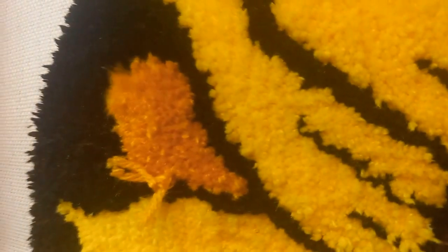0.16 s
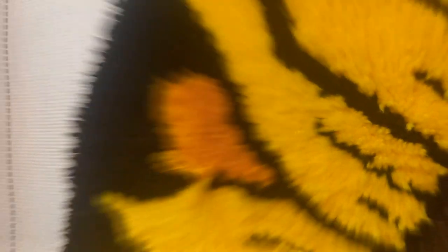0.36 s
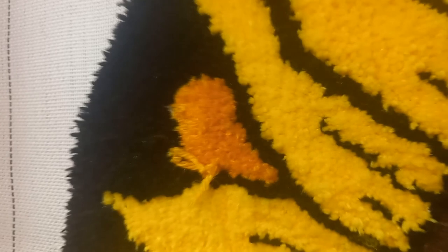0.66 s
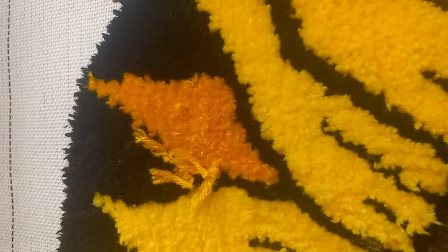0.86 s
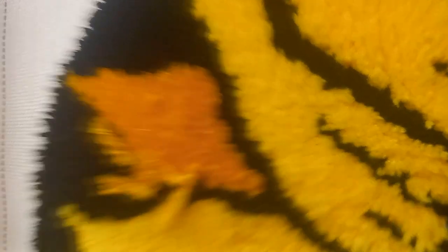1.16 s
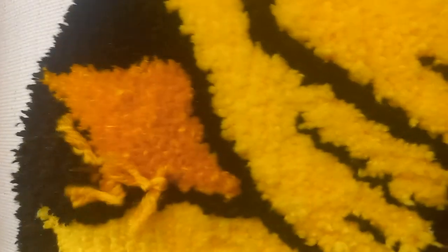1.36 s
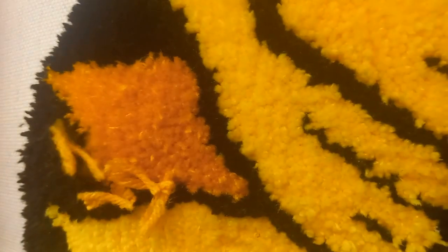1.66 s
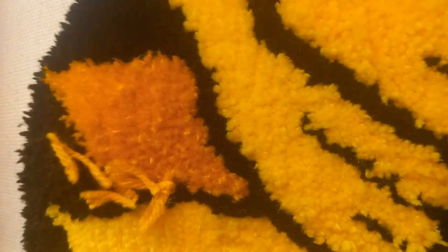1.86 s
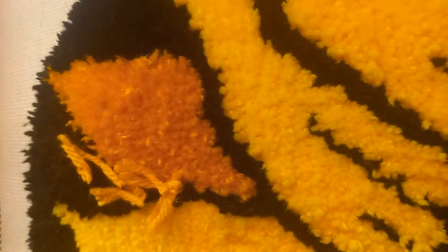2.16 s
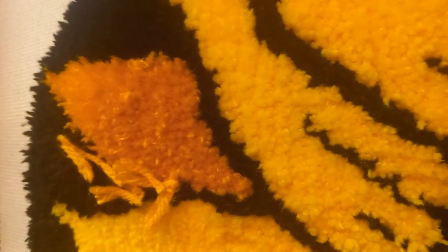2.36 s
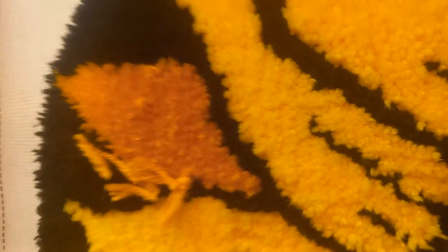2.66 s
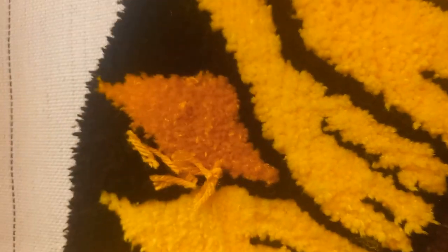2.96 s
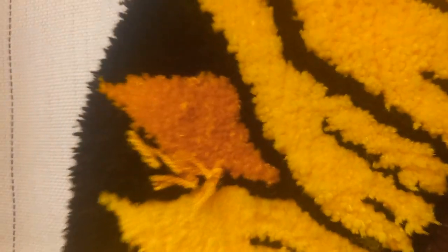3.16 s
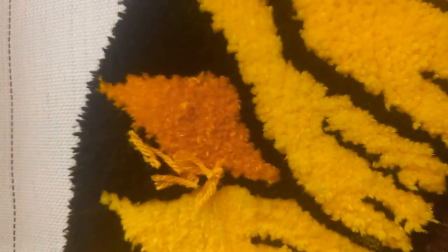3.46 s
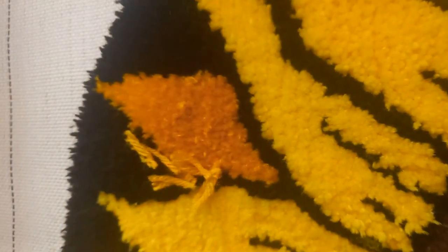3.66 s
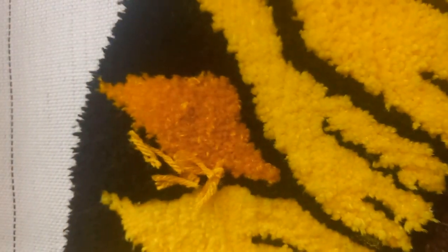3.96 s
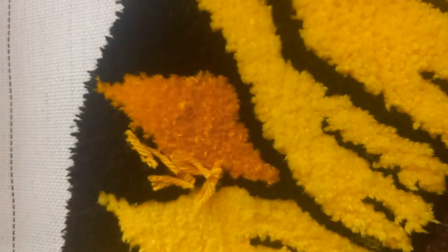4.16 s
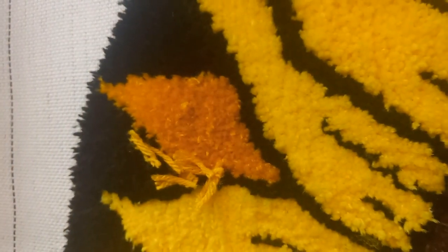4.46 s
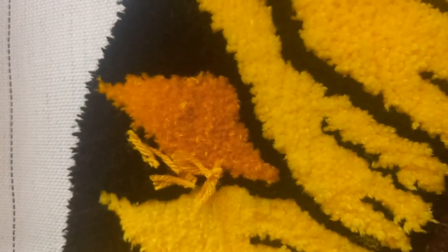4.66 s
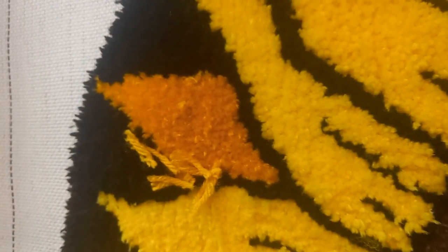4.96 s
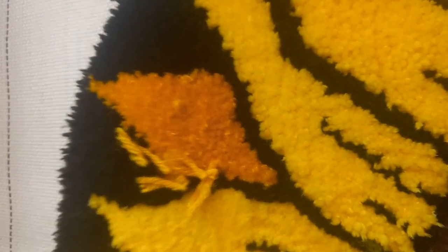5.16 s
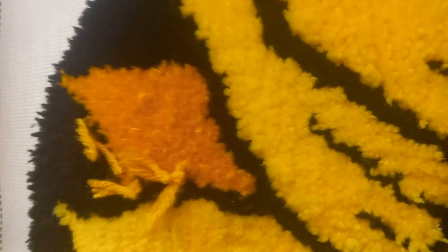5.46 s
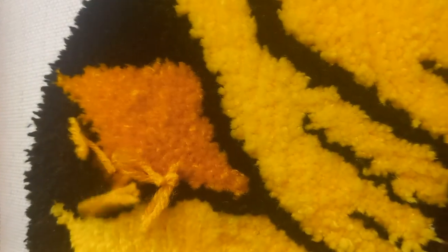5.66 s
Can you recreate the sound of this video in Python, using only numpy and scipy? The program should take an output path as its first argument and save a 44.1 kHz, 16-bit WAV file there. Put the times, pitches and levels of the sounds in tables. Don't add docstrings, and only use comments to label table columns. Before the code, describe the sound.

Close phone recording in a small workshop with a short, bright echo. A tufting gun is already running at 0 s: harsh brush rattle, low cloth thumps and crisp scissor snips about eleven times a second, and a gear whine around 2.2 kHz swinging in pitch twice per stroke. It cuts off at 0.3 s with a click and a short ring. Quiet low hum follows; a soft cloth rustle and dull bumps come near 1.18 s. At 1.34 s the trigger clacks, the case rings and the motor surges, then runs steadily, with heavier knocks around 2.14 and 2.33 s. It slows slightly and stops at about 2.75 s, its echo dying within half a second. The hum is nearly gone, then creeps back from about 4 s. Tiny dry yarn ticks fall between 4.1 and 5.25 s. At 5.56 s a hard click and clunk restart the gun, louder and shriller, running to the end.

```python
import sys
import numpy as np
from scipy import signal
from scipy.fft import rfft, irfft, next_fast_len
from scipy.io import wavfile
from scipy.ndimage import map_coordinates

SR = 44100
rng = np.random.default_rng(int(sys.argv[2]) if len(sys.argv) > 2 else 0)


def voltage_ratio(level):
    return 10 ** (np.asarray(level, float) / 20)


def wrap_up_sound(samples):
    columns = np.atleast_2d(samples).T
    tamed = np.clip(columns, -1, 1)
    steps = np.round(tamed * 32767).astype(np.int16)
    wavfile.write(sys.argv[1], SR, steps)


N = 255853
T = np.arange(N) / SR
SCENE_CHANGE_S = .856


def unit(x):
    return x / np.sqrt(np.mean(x ** 2) + 1e-20)


def along(points, hz, axis=1):
    rows = np.transpose(points)
    return np.interp(np.log(hz + 1), np.log(rows[0] + 1), rows[axis])


def wobble(rate):
    knots = rng.standard_normal(int(N * rate / SR) + 4)
    return map_coordinates(knots, [T * rate])


def filtered(x, response):
    m = next_fast_len(N + SR // 2)
    spectrum = rfft(x, m) * response(np.fft.rfftfreq(m, 1 / SR))
    return irfft(spectrum, m)[..., :N]


def hiss(response):
    return unit(filtered(rng.standard_normal((2, N)), response))


def heard(two, pair):
    def ear(sign, hz):
        blend = np.arccos(np.clip(along(pair, hz), 0, 1)) / 2
        balance = voltage_ratio(sign * along(pair, hz, axis=2) / 2)
        lead = np.exp(.5j * sign * along(pair, hz, axis=3))
        return balance * lead * np.array([np.cos(blend), sign * np.sin(blend)])
    return np.array([filtered(two, lambda hz: ear(sign, hz)).sum(0) for sign in (1, -1)])


# (power on [s], power off [s], start surge [dB], controller kick [dB], gain control depth [dB])
BURSTS = [
    (-.07, .302, 4, 2, 16.5),
    (1.339, 2.765, 5.5, 15, 12),
    (5.562, 6.5, 6, 28, 10),
]
CLAMP_S, HOLD_S, RECOVER_S = 0.57, 1.096, 0.27


def gain_control():
    gain_db = 0
    for on, off, *_, depth_db in BURSTS:
        closing = (T > on) * (1 - np.exp(-np.abs(T - on) / CLAMP_S))
        shut = closing * np.exp(-np.clip(T - off - HOLD_S, 0, None) / RECOVER_S)
        gain_db = gain_db - depth_db * shut * ((on > 0) | (T < SCENE_CHANGE_S))
    return gain_db


# (frequency [Hz], density [dB per Hz])
HUM_COLOUR = [(32, -41.5), (55, -14), (108, -1), (188, -9.5), (251, -7.5), (285, -2), (392, -11), (432, -8),
              (557, -13.5), (708, -21.5), (2500, -36.5), (3250, -72.5), (5500, -120)]
# (frequency [Hz], density [dB per Hz])
HISS_COLOUR = [(1180, -34.5), (2000, -6.5), (2220, -11.5), (2740, -3.5), (4940, -7.5), (9250, -22.5),
               (10600, -12.5), (12700, -6.5), (15200, -6.5), (16000, -14)]
# (frequency [Hz], likeness [0-1], left over right [dB], left lead [rad])
TONE_PAIR = [(90, 0.77, -1.5, 0), (300, 0.89, -0.3, .25), (600, 1, -2, 1.1), (1060, 0.14, 3.5, 0.96),
             (1600, .1, -2.5, 0.35), (7920, .03, 7.5, 0.06), (13500, .01, -1, 0.19)]
HUM_DB, HISS_DB, HISS_DEPTH = -44.5, -65, 1.19
RUSTLE_S, RUSTLE_DB, RUSTLE_HALF_S = 1.172, 8, 0.034


def room_tone():
    gain_db = gain_control()
    rustle_db = RUSTLE_DB * np.exp(-((T - RUSTLE_S) / RUSTLE_HALF_S) ** 2)
    hum_db = HUM_DB + gain_db + .4 * rustle_db + 0.71 * wobble(12)
    hum = hiss(lambda f: voltage_ratio(along(HUM_COLOUR, f))) * voltage_ratio(hum_db)
    air_db = HISS_DB + HISS_DEPTH * gain_db + rustle_db
    air = hiss(lambda f: voltage_ratio(along(HISS_COLOUR, f))) * voltage_ratio(air_db)
    return heard(hum + air, TONE_PAIR)


# (frequency [Hz], time to fall 60 dB [s])
SHOP_DECAY = [(100, 0.24), (500, 0.45), (1100, 0.55), (2200, 0.57), (3500, 0.65), (6000, 0.56),
              (14000, 0.29)]


def shop(x):
    _, t, z = signal.stft(noise := rng.standard_normal((2, SR * 3 // 4)), SR, nperseg=256)
    hz = np.fft.rfftfreq(256, 1 / SR)
    fade_db = -60 * t * (0.74 + 1.1 * t) / along(SHOP_DECAY, hz)[:, None]
    tail = signal.istft(z * voltage_ratio(fade_db), SR, nperseg=256)[1]
    tail = tail / np.linalg.norm(tail[0])
    delayed = np.pad(x, (300, 0))[None]
    return signal.fftconvolve(delayed, tail, axes=1)[:, :N]


# (time [s], peak [dB])
TICKS = [
    (1.177, -51),
    (4.0844, -76),
    (4.4593, -58),
    (4.8444, -63),
    (4.9142, -59.5),
    (5.0855, -62),
    (5.253, -53.5),
]


def ticks():
    gate = sum((T > s) * voltage_ratio(db + 3.5 - 60 * np.abs(T - s) / 0.014) for s, db in TICKS)
    colour = [(2500, -28), (5000, -2.5), (7000, -2.5), (12000, -13), (16000, -17.5)]  # (Hz, dB per Hz)
    return gate * hiss(lambda f: voltage_ratio(along(colour, f))) * voltage_ratio([[2.2], [-2.2]])


# (time [s], peak [dB], pitch [Hz])
THUDS = [(0.261, -27.5, 300), (1.177, -36, 142), (1.194, -34, 85), (1.342, -22.5, 380), (1.348, -24.5, 125),
         (1.362, -15.5, 501), (1.444, -27, 237), (2.086, -25, 200), (2.137, -27.5, 226),
         (2.277, -25.5, 113), (2.328, -31.5, 218), (2.361, -33.5, 181), (2.379, -20.5, 105.1),
         (2.38, -22, 419), (2.76, -28.5, 130), (5.078, -33, 104), (5.5687, -20, 226), (5.579, -14, 600)]
# (pitch [Hz], time to fall 60 dB [s], hits [(time [s], peak [dB])])
RINGS = [
    (300, .18, [(1.352, -23), (5.628, -27)]),
    (2211.7, 0.19, [(.303, -33), (1.354, -24), (2.738, -26), (5.546, -50.5), (5.579, -22)]),
    (1086, 0.092, [(5.578, -22), (5.603, -27.5)]),
    (2025, 0.097, [(1.371, -28)]),
    (2480, 0.011, [(1.318, -45), (1.33, -42), (5.531, -48), (5.543, -29)]),
    (3760, .012, [(1.343, -32), (5.561, -27.5)]),
    (5400, .012, [(1.341, -28), (5.562, -32)]),
]
# (time [s], peak [dB])
CRACKS = [(.112, -40), (.288, -36.5), (.302, -33), (1.344, -33.5), (1.352, -36), (1.383, -34),
          (1.362, -32.5), (1.37, -29.5), (1.445, -34.5), (2.137, -36), (2.328, -38.5), (5.546, -61.5),
          (5.577, -40.5)]
THUD_CYCLES = 12
LOOSE = .018


def knocks():
    out, shake = np.zeros((2, N)), wobble(250)
    rings = [(s, db, hz, THUD_CYCLES / hz) for s, db, hz in THUDS]
    rings += [(s, db, hz, t60) for hz, t60, hits in RINGS for s, db in hits]
    for s, db, hz, t60 in rings:
        near = slice(round(s * SR), round(s * SR) + SR // 5)
        t = T[near] - s
        sag = 1 - np.exp(-t / .004) if hz < 1000 else 0
        cycles = hz * (t + LOOSE * np.cumsum(shake[near]) / SR) + 0.74 * sag
        out[0, near] += voltage_ratio(db - 60 * t / t60) * np.sin(2 * np.pi * cycles)
    gate = sum((T > s) * voltage_ratio(db - 60 * np.abs(T - s) / 0.012) for s, db in CRACKS)
    return out + gate * rng.standard_normal((2, N))


# (time [s], depth [dB], recovery [s])
DUCKS = [
    (.113, -5.5, 0.059),
    (1.433, -13.5, 0.038),
    (2.133, -8.5, 0.054),
    (2.312, -8, 0.079),
]


def ducking():
    gain_db = 0
    for s, db, back in DUCKS:
        drop = np.clip((T - s) / .006 + .5, 0, 1)
        gain_db = gain_db + db * drop * np.exp(-(np.abs(T - s) / back) ** 2)
    return voltage_ratio(gain_db)


RATTLE_DB, BODY_DB, DRIVE_DB, LOW_GEARS_DB = -38.5, -36, -51.5, -1
RISE_S, SURGE_S, KICK_S = .018, .1, .035
STRAIN_S, STRAIN_SHARE = .6, .5
LOW_SHARE, LOW_S, BODY_SURGE_SHARE, BODY_LAG_S = 1.6, .09, 1.2, .006
EASE_S, EASE_DB, FLARE_S, FLARE_DB = 0.2, 3.5, .04, -3
RATTLE_FALL, BODY_FALL, DRIVE_FALL = 1050, 540, 700


def power():
    levels = np.full((4, N), -150.)
    for on, off, surge_db, kick_db, _ in BURSTS:
        since, left, after = np.abs(T - on), np.clip(off - T, 0, None), np.clip(T - off, 0, None)
        surge = surge_db * (np.exp(-since / SURGE_S) - 1.3 * np.exp(-since / RISE_S))
        kick = kick_db * np.exp(-(since / KICK_S) ** 1.2) * (1 - np.exp(-since / 0.004))
        strain = STRAIN_SHARE * kick_db * np.exp(-since / STRAIN_S)
        lag_db = -25 * np.exp(-since / BODY_LAG_S)
        flare = np.exp(-left / FLARE_S)
        ease_db = EASE_DB * np.exp(-left / EASE_S)
        rattle = RATTLE_DB + surge + FLARE_DB * flare - RATTLE_FALL * after
        body = BODY_DB + BODY_SURGE_SHARE * surge + lag_db - ease_db - BODY_FALL * after
        drive = DRIVE_DB + kick + lag_db + strain - 7 * flare - DRIVE_FALL * after
        low_gears = LOW_GEARS_DB + LOW_SHARE * surge_db * np.exp(-since / LOW_S) + lag_db
        levels = np.where((T > on) & (after < .045), [rattle, body, drive, low_gears], levels)
    return levels


# (frequency [Hz], width [Hz], level [dB])
HOUSING = [(291.7, 230, -9), (573, 30.5, 3), (830, 170, -4), (1580, 31, -13.5), (2140, 170, -6.5),
           (3050, 100, -8.5), (3500, 210, -25.5), (4560, 110, -11), (5810, 83, -18.5)]
# (frequency [Hz], density [dB per Hz])
BODY = [(30, -36), (90, 5), (250, -9), (700, -20.5), (1800, -10), (4000, -24), (7000, -41.5)]
# (frequency [Hz], density [dB per Hz])
RATTLE = [(2060, -7.5), (3500, 2.5), (3750, -3), (4530, 0), (4950, -6.5), (5690, -4), (6210, -9.5),
          (7850, -15.5), (9480, -21.5), (11700, -16.5), (13700, -18), (15800, -19)]


def motor(angle, rattle_db, body_db, drive_db):
    def ring(f):
        total = 0
        for k, (centre, width, db) in enumerate(HOUSING):
            damping = 1j * f * width
            total = total + (-1) ** k * voltage_ratio(db) * damping / (centre ** 2 - f * f + damping)
        return total
    swing = np.cos(4 * np.pi * (angle - .3))
    body = hiss(lambda f: ring(f) + voltage_ratio(along(BODY, f)))
    body = body * voltage_ratio(body_db + 2.5 * swing + 2 * wobble(45))
    rattle = hiss(lambda f: voltage_ratio(along(RATTLE, f)))
    rattle = rattle * voltage_ratio(rattle_db + 1.5 * swing + 2.4 * wobble(150))
    drive = voltage_ratio(drive_db + 1.2 * wobble(40)) * np.sin(2 * np.pi * 4570 * T + .4 * wobble(30))
    return body + rattle + drive * [[1], [0]]


# (snip [s], thump [dB], whine on the down stroke [dB], whine on the up stroke [dB])
TURNS = [
    [(0.0741, -26.5, -33.5, -24), (0.1659, -27, -28, -25.5), (0.2587, -28, -30, -38.5)],
    [(1.395, -25, -26.5, -29.5), (1.4898, -24.5, -28, -24.5), (1.5821, -26, -31.5, -29),
     (1.6751, -27.5, -28, -34.5), (1.7667, -26, -26.5, -29.5), (1.86, -25.5, -30, -26.5),
     (1.9537, -27.5, -31.5, -29), (2.0465, -23, -28.5, -29.5), (2.1404, -25, -26, -29.5),
     (2.2371, -26, -30, -36.5), (2.3281, -19.5, -25.5, -41), (2.4272, -26.5, -25.5, -27.5),
     (2.5195, -26, -29, -28.5), (2.6112, -28.5, -25.5, -29), (2.7035, -29, -33.5, -38)],
    [(5.6229, -25, -27, -26), (5.7137, -26.5, -24.5, -27.5)],
]
TURN_S = .0925
SNIP_DB, SNIP_SCATTER_DB, FRESH_DB, FRESH_S = -33.5, 1, 6.5, 0.33


def crank():
    rows = []
    for burst, (on, *_) in zip(TURNS, BURSTS):
        rows.append((burst[0][0] - TURN_S, -90, burst[0][1] - 4, -31, -31))
        for s, *rest in burst:
            fresh_db = FRESH_DB * np.exp((on - s) / FRESH_S)
            rows.append((s, SNIP_DB + fresh_db + SNIP_SCATTER_DB * rng.normal(), *rest))
    s = np.array([(row[0], row[0] + TURN_S * .999) for row in rows])
    joined = np.diff(s[:, 0]) < 1.5 * TURN_S
    s[:-1, 1] = np.where(joined, s[1:, 0] - 1e-4, s[:-1, 1])
    turns = np.arange(len(rows))[:, None] + [0, .999]
    return np.array(rows), np.interp(T, s.ravel(), turns.ravel())


# (multiple of the mesh pitch [ratio], level [dB], swing share [ratio])
MESH = [(.142, -18, 1.5), (.265, -18, 2), (0.351, -16, 2.2), (.485, -3, 2), (.72, -12, 1.5), (1, 1.5, 1),
        (1.35, -26, 1), (1.56, -19, .5), (1.801, -19.5, 1), (2.56, -22, 1)]
STARTS = [1.341, 5.563]
# (time [s], share of speed lost [1/s])
STOPS = [(.288, 16), (2.706, 6.5)]


def gears(rows, angle, on, low_db):
    beat = 4 * np.pi * (angle - .33)
    swing = -.051 * (np.sin(beat) - .35 * np.sin(2 * beat)) + .011 * wobble(60)
    speed = 1 - sum(.8 * (T > s) * np.exp(-np.abs(T - s) / .005) for s in STARTS)
    speed -= sum(loss * np.clip(T - s, 0, .05) * (T < s + .2) for s, loss in STOPS)
    peaks = (np.arange(len(rows))[:, None] + [.31, .81]).ravel()
    load_db = np.interp(angle, peaks, rows[:, 3:].ravel())
    lines = 0
    for k, db, share in MESH:
        phase = 2 * np.pi * np.cumsum(k * 2225 * speed * (1 + share * swing)) / SR
        bite_db = (7 if k == 1 else 4) * (np.cos(beat + .2) - 1) + 3 * wobble(110)
        lines = lines + voltage_ratio(db + bite_db + (k < .9) * low_db) * np.sin(phase)
    return on * voltage_ratio(load_db) * lines


BLOW_AT = [.32, .13, .18, .73, .9]
# (pitch [Hz], level [dB], half length [s])
BLOWS = [(81.5, 3, 0.0078), (162, -12.5, 0.009), (313, -11, 0.014), (98.6, -1.5, 0.0057), (66, -5.5, 0.005)]
# (frequency [Hz], density [dB per Hz])
SNIP = [(4000, -29.5), (7500, -4), (9500, -21.5), (11700, -3), (13500, -7), (15500, -9.5)]


def needle(rows, on):
    cloth, gate = np.zeros(N), np.zeros(N)
    for s, snip_db, thump_db, *_ in rows:
        near = slice(max(0, round((s - .03) * SR)), max(0, round((s + .13) * SR)))
        t = T[near] - s
        for share, (hz, db, half) in zip(BLOW_AT, BLOWS):
            u = t - share * TURN_S - rng.normal(0, .0005)
            swing = np.exp(-(u / half) ** 2) * np.cos(2 * np.pi * hz * u)
            cloth[near] -= voltage_ratio(thump_db + db + rng.normal(0, 1.6)) * swing
        for lag, db in ((0, -0.5), (.025, -7), (.041, -5)):
            gate[near] += (t > lag) * voltage_ratio(snip_db + db - 60 * np.abs(t - lag) / 0.018)
    return on * (cloth * [[1], [0]] + gate * hiss(lambda f: voltage_ratio(along(SNIP, f))))


# (frequency [Hz], likeness [0-1], left over right [dB], left lead [rad])
GUN_PAIR = [(90, .99, 3.5, .45), (170, .97, 1, .3), (300, .88, -3.5, .2), (600, .5, -3, 1.8),
            (1050, .65, 0, 1.9), (1600, .6, 0, .5), (2200, .98, 4.3, .5), (3300, .4, 0, .5),
            (4570, .6, .5, 2.3), (5750, .1, 6.5, 0), (9000, .05, 18, 0), (13500, .1, 10, 0)]
WETTER_DB = 3


def scene():
    rows, angle = crank()
    *levels, low_db = power()
    on = np.clip((levels[0] + 62) / 14, 0, 1)
    whine = gears(rows, angle, on, low_db) * [[1], [0]]
    gun = heard(motor(angle, *levels) + needle(rows, on) + whine, GUN_PAIR)
    hits = heard(knocks(), GUN_PAIR)
    aside = lambda f: 1 - .12 * np.exp(-((f - 2230) / 200) ** 2)
    echo = heard(shop(filtered(gun[0] + hits[0], aside)), TONE_PAIR)
    echo = echo * voltage_ratio(-9.0 + WETTER_DB * (T < SCENE_CHANGE_S))
    return ducking() * (gun + echo) + hits + room_tone() + ticks()


def top_cut(x):
    return signal.sosfilt(signal.butter(12, 16890, fs=SR, output="sos"), x)


def record(dry):
    def phone(hz):
        bass = voltage_ratio(-24.5) + 1 / (1 + (57 / (hz + 1)) ** 11)
        return (hz < 16050) * bass
    return top_cut(filtered(dry, phone))


dry = scene()
out = record(dry)
wrap_up_sound(out)
```